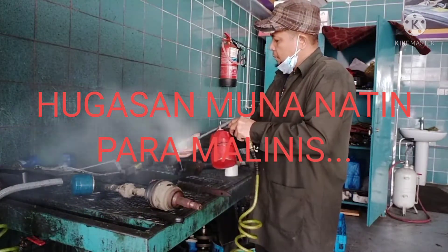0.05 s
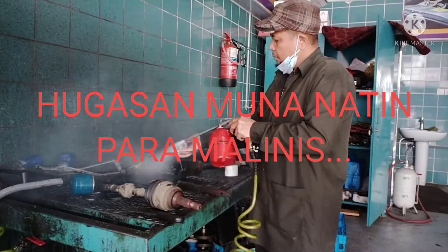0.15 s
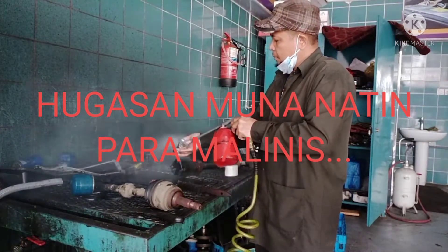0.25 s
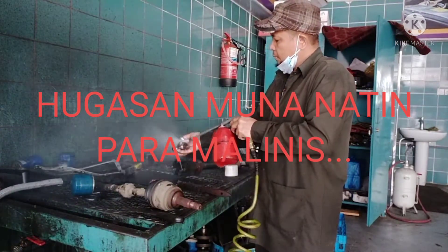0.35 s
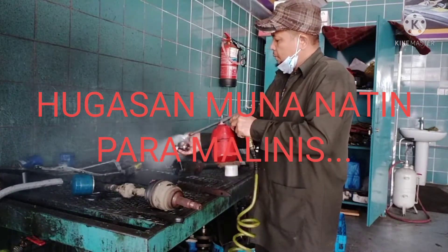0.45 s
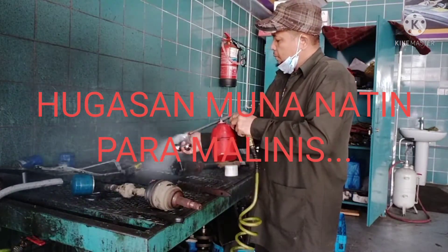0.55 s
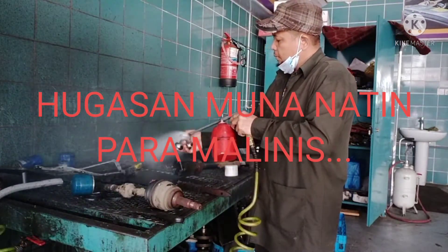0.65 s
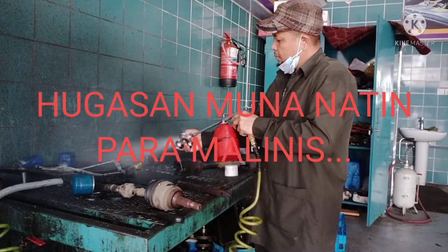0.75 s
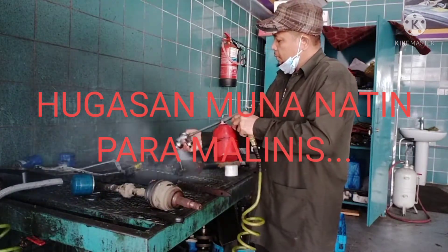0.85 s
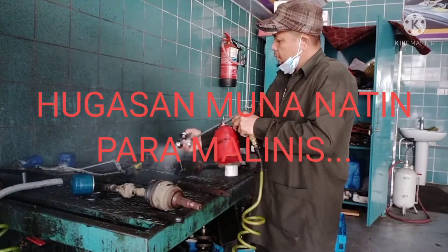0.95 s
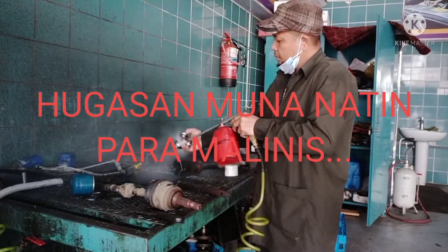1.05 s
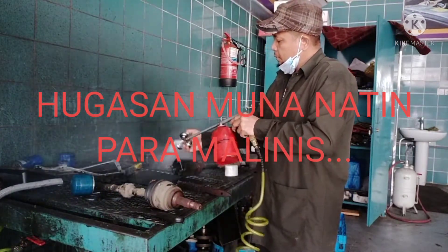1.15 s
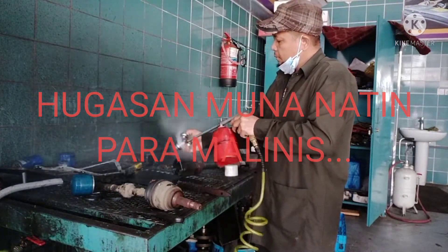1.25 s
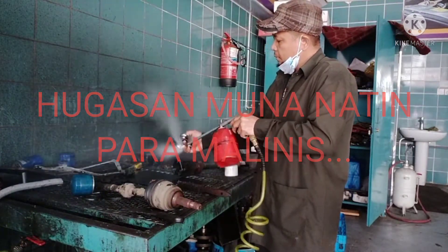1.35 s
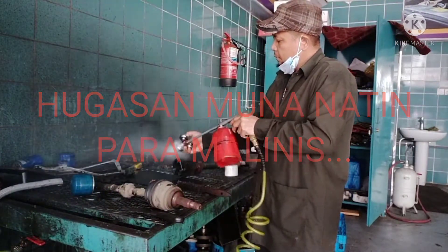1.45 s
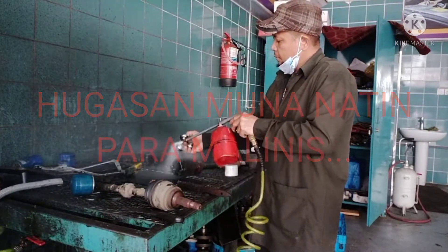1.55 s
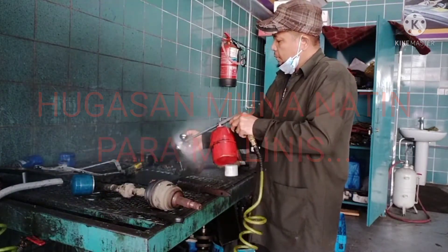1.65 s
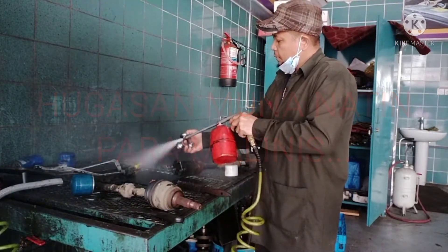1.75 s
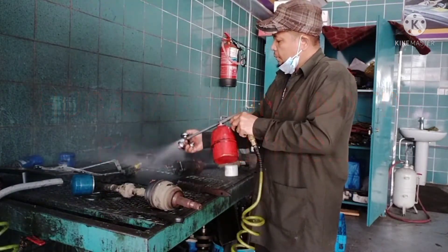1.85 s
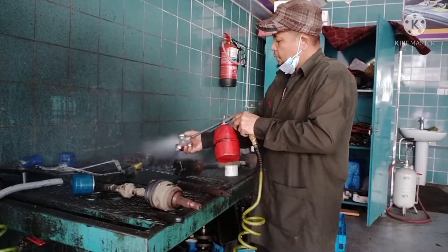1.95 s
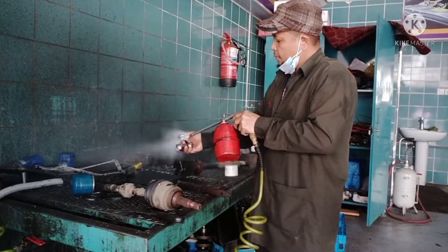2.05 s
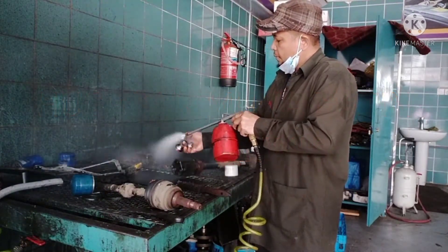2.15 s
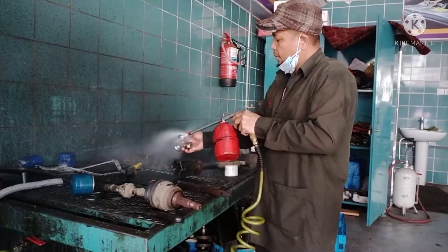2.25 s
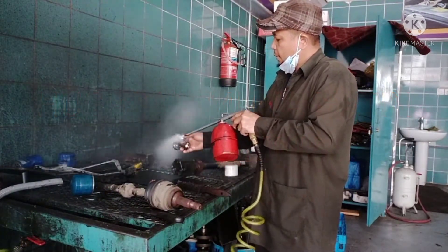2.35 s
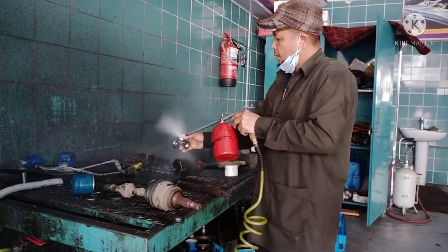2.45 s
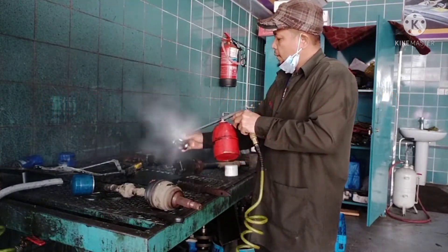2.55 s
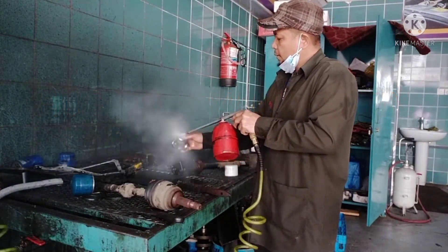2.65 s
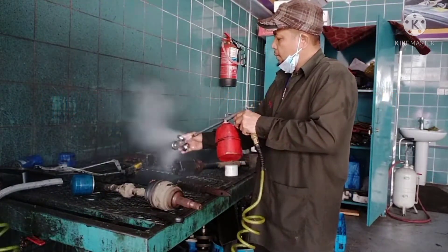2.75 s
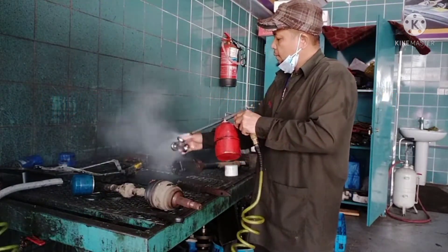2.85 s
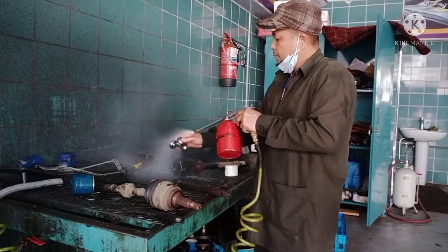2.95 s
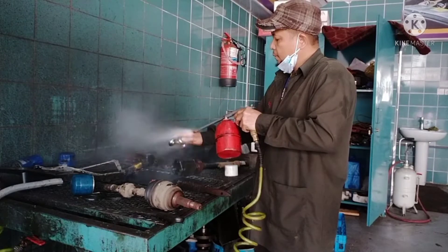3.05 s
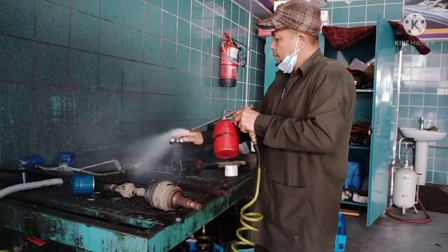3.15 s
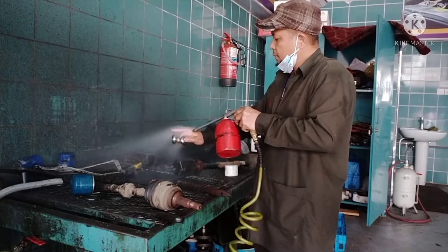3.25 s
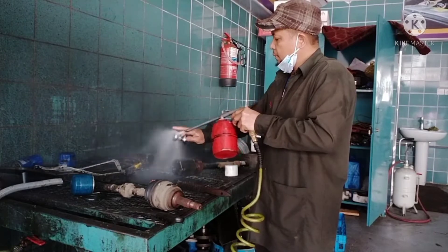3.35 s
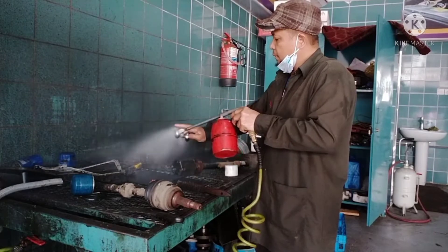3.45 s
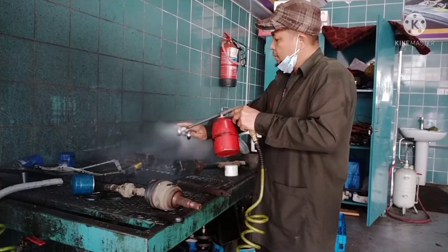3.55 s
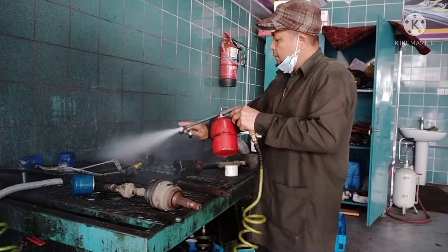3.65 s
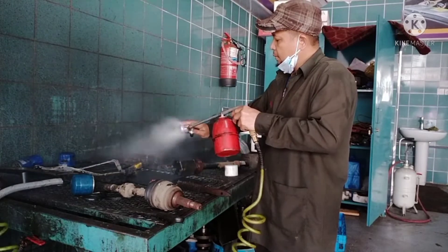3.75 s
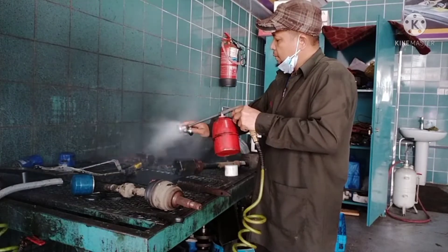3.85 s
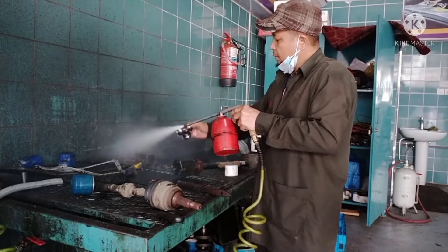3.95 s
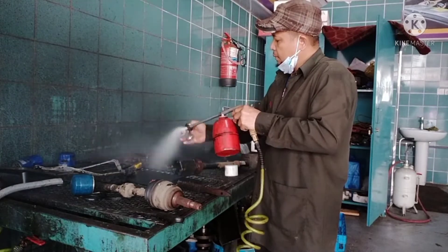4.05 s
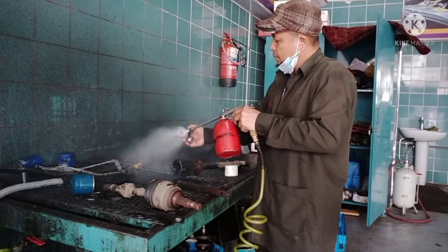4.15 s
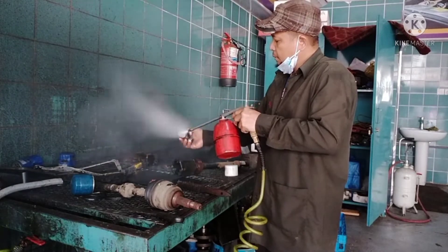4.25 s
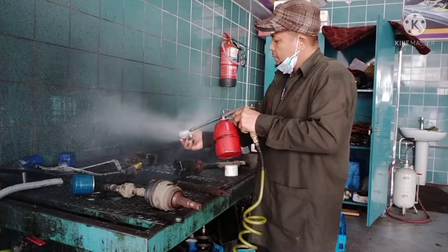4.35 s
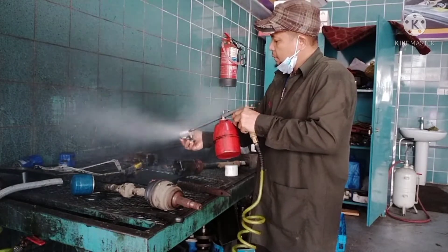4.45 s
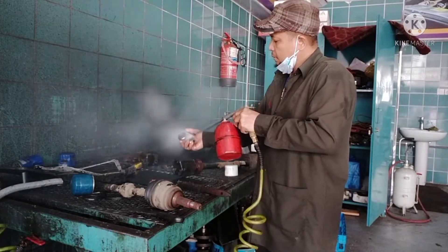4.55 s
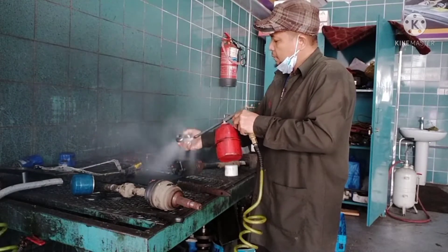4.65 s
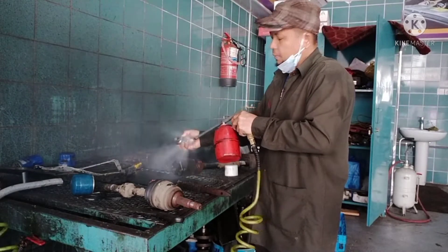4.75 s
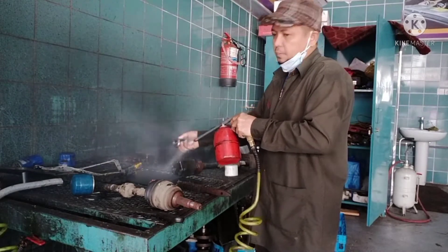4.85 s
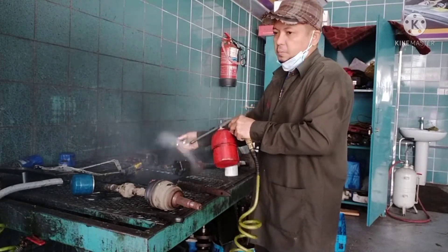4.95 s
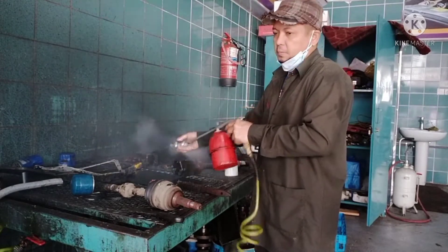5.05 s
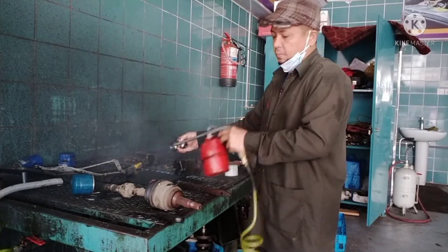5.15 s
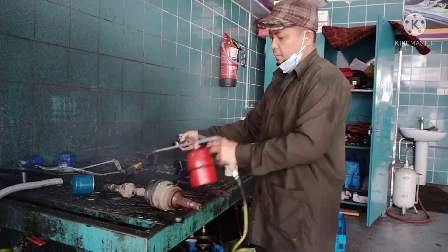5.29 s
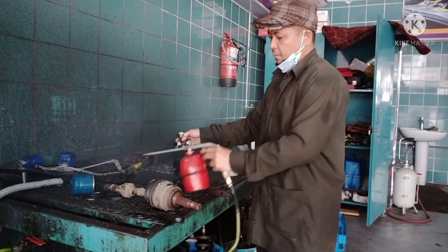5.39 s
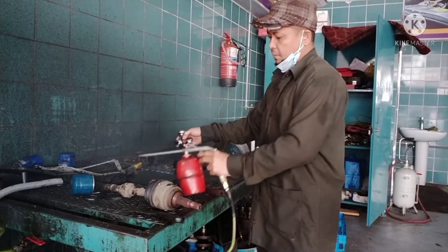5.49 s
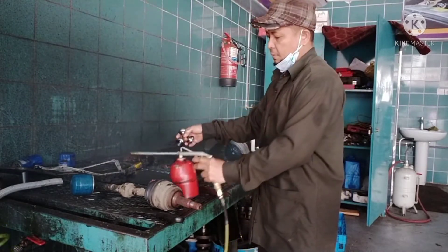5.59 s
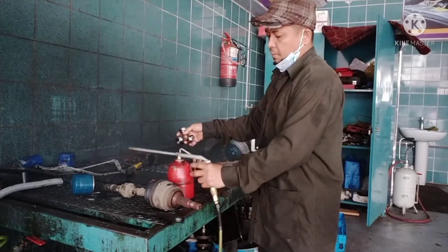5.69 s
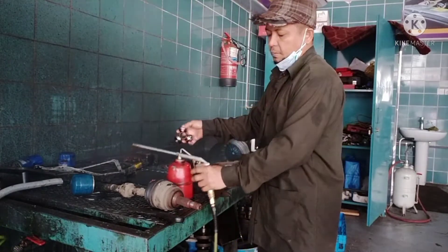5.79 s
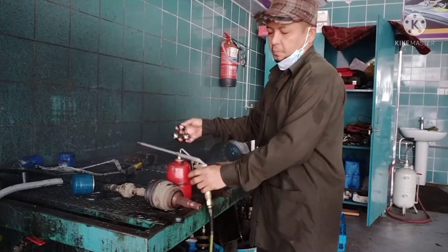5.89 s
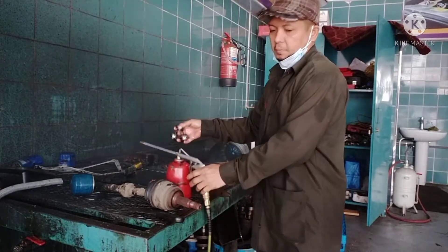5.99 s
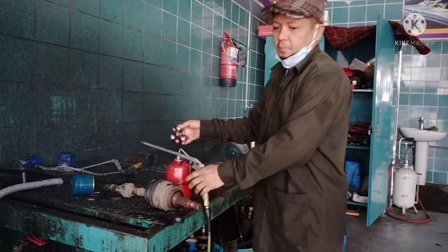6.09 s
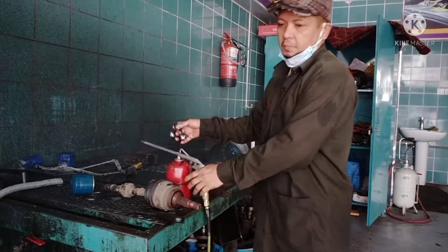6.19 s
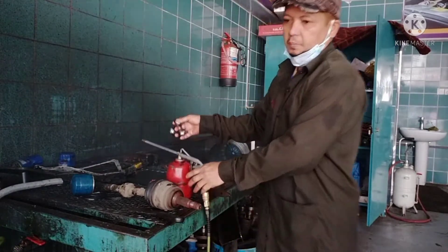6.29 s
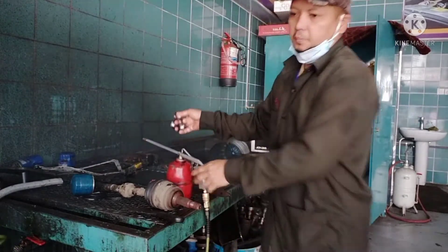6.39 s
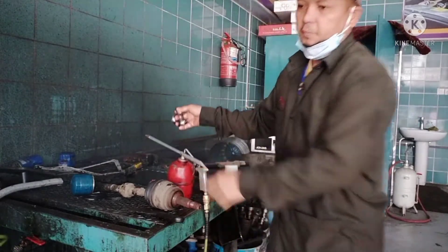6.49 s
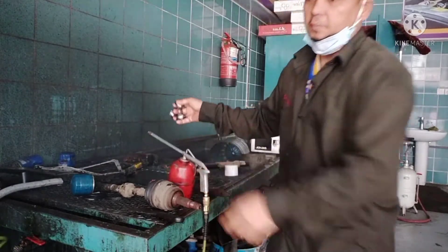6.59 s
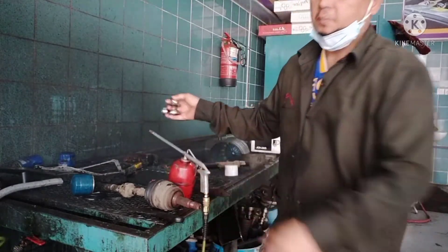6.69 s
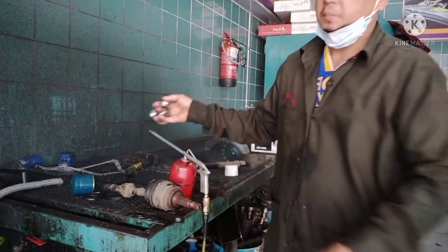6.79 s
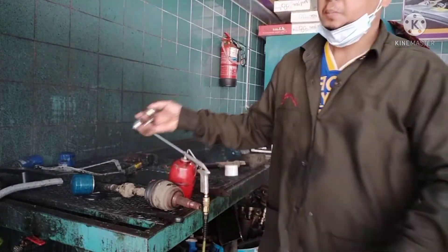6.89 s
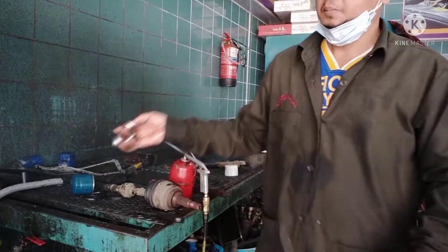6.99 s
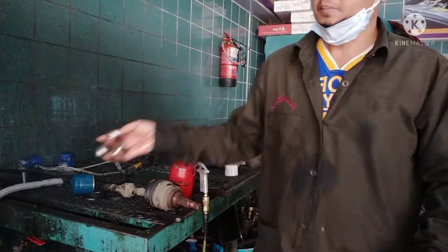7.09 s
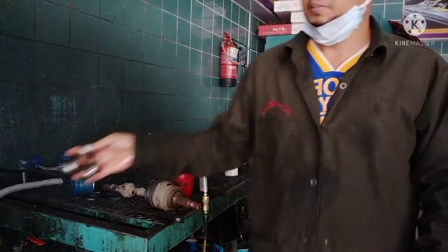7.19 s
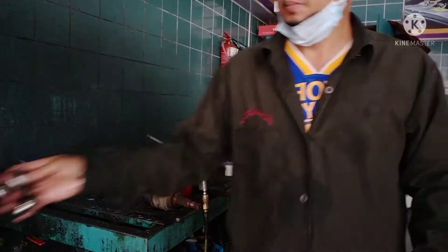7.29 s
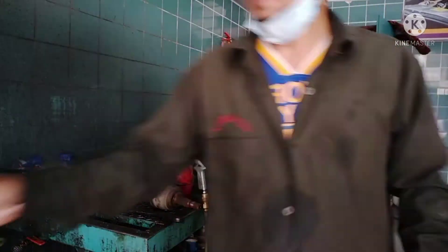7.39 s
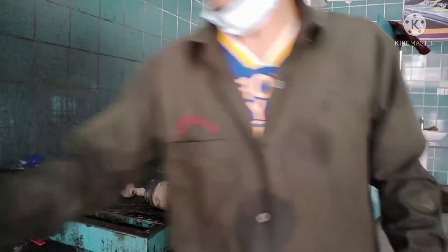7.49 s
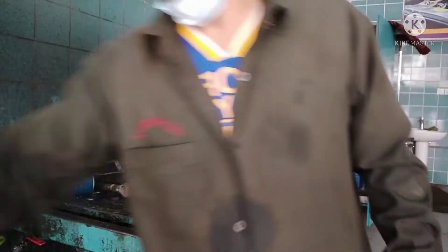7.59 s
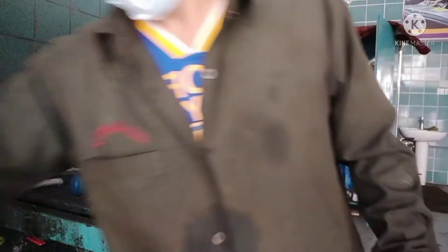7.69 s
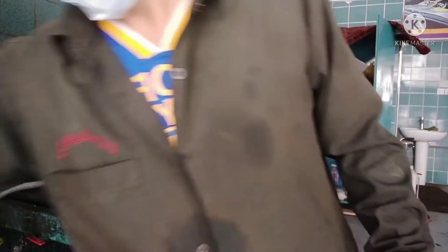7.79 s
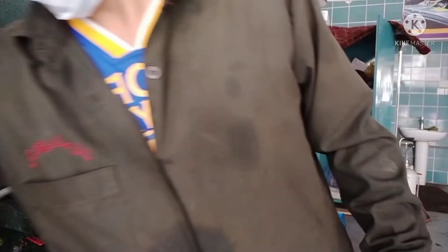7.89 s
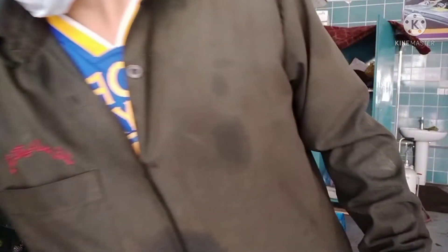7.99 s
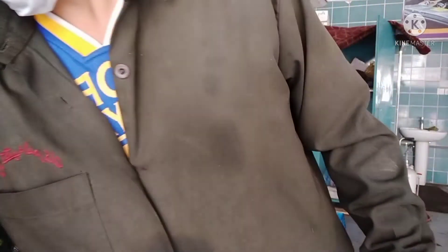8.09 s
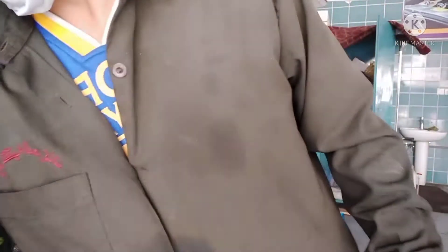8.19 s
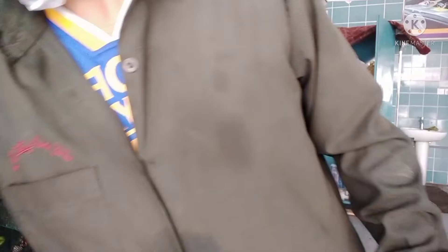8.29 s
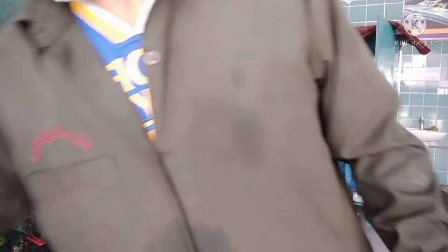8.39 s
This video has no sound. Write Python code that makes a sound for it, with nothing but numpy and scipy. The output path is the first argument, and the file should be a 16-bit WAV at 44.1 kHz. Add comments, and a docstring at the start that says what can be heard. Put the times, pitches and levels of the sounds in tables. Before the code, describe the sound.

From 0 s a compressed-air spray gun is in full flow in a hard, tiled workshop, heard by one fairly near microphone. A very bright airy hiss with a ringing high edge sits over a rough, wet midrange roar and fine sizzling mist. The liquid falters in quick gaps and surges, most broken around 2.6 to 3.2 s, with tiny spits and brief breathy whistles near 0.8, 3.2, 4.1 and 4.6 s. Around 4.9 s the trigger is released; a hollow low draught buffets the microphone near 5 s and the wet roar dies away. A last spurt sizzles at 5.5 s, then a quieter, wavering air leak persists with a dull rush and a faint fading whistle. Deep rumble becomes clearer. From about 7 s the hiss is coloured slightly by a close body, and a low motor hum swells near 7.6 s, easing after 8 s as the leak continues to the end.

```python
"""A bright jet hisses at once, and the liquid it draws roars, spits and gaps: a compressed-air spray gun
washes metal parts on a bench in a tiled workshop. Filtered noise makes the air, noise and random drops the liquid.
Near 5 s a draught puffs on the microphone and the spraying stops; air goes on leaking from the gun.
The worker steps up close and his chest reflects the hiss; delayed copies of the gun make all its echoes.
The workshop rumbles underneath, and a low motor hum, a wavering sine with a noisy drone, swells near the end."""
import sys
import numpy as np
from scipy import signal
from scipy.fft import rfft, irfft, next_fast_len
from scipy.io import wavfile

SR = 44100
rng = np.random.default_rng(int(sys.argv[2]) if len(sys.argv) > 2 else 0)


def generate_wav(sig):
    """Save sig (samples, or channels by samples) to the path in sys.argv[1] as 16-bit PCM at SR."""
    pcm = np.round(np.clip(np.atleast_2d(sig).T, -1, 1) * 32767).astype(np.int16)
    wavfile.write(sys.argv[1], SR, pcm)


N = 371763
TIME = np.arange(N) / SR   # s
FFT_LENGTH = 2 * next_fast_len(N // 2 + 1)
FREQS = np.maximum(np.fft.rfftfreq(FFT_LENGTH, 1 / SR), 1)   # Hz

TRIGGER_OFF_S, TRIGGER_CLOSE_S = 4.89, 0.065   # the trigger is let go, and how long the air takes to shut
NEAR_S, APPROACH_S = 7.37, 0.37   # the worker's chest is close to the microphone, and how long he takes to come


def from_db(db):
    """Decibels to gain."""
    return 10 ** (np.asarray(db) / 20)


def rms_one(x):
    """Scale to rms 1."""
    return x / np.sqrt(np.mean(x ** 2) + 1e-20)


def curve(rows):
    """A control curve as a value per sample, held beyond its ends."""
    return np.interp(TIME, *np.transpose(rows))


def ramp(end_s, length_s):
    """Rise from 0 to 1, arriving at end_s."""
    return np.clip(1 + (TIME - end_s) / length_s, 0, 1)


def swell(peak_s, attack_s, db, fall_db_per_s, hold_s=0):
    """Envelope: a straight attack, a hold, then a steady fall in dB."""
    falling_s = np.maximum(TIME - peak_s - hold_s, 0)
    return ramp(peak_s, attack_s) * from_db(db - fall_db_per_s * falling_s)


def bumps(rows):
    """Sum of bell shapes given as (middle, length, height)."""
    out = np.zeros(N)
    for middle_s, length_s, height in rows:
        near = slice(*np.searchsorted(TIME, [middle_s - 2 * length_s, middle_s + 2 * length_s]))
        out[near] += height * np.exp(-(2 * (TIME[near] - middle_s) / length_s) ** 2)
    return out


def shaped(x, response):
    """Filter by a gain per frequency."""
    return irfft(rfft(x, FFT_LENGTH) * response)[:N]


def colour(points):
    """A short spectrum as a gain per frequency, falling 20 dB per octave beyond its ends."""
    hz, db = np.transpose(points)
    octaves_outside = np.abs(np.log2(FREQS / np.clip(FREQS, hz[0], hz[-1])))
    return from_db(np.interp(np.log(FREQS), np.log(hz), db) - 20 * octaves_outside)


def resonance(hz, width_hz):
    """Gain per frequency of one resonance."""
    return 1 / np.sqrt(1 + ((FREQS ** 2 - hz ** 2) / (FREQS * width_hz)) ** 2)


def drift(rate):
    """Smooth chance of spread 1 that changes about rate times a second."""
    pole = np.exp(-40 * np.pi * rate / SR)   # runs at one value per 20 samples
    white = rng.standard_normal(N // 20 + 4002)
    slow = signal.lfilter([1], [1, -2 * pole, pole * pole], white)[4000:]
    return np.interp(np.arange(N) / 20, np.arange(len(slow)), rms_one(slow))


def noise(response):
    """Smooth coloured noise of rms 1."""
    return rms_one(shaped(rng.standard_normal(N), response))


def turbulent(source, response, eddy_db, count=8):
    """Colour a source; eddies make neighbouring bands swell and sink on their own."""
    # overlapping bands that each carry a like share of the power
    place = np.cumsum(response ** 2) / np.sum(response ** 2) * (count - 1)
    spectrum = rfft(source, FFT_LENGTH) * response
    total = np.zeros(N)
    for k in range(count):
        band = irfft(spectrum * np.maximum(0, 1 - np.abs(place - k)))[:N]
        total += band * from_db(eddy_db * drift(28))
    return rms_one(total)


def droplets(per_s, spread_db):
    """Random impacts, mostly small and now and then large."""
    sizes = from_db(spread_db * np.minimum(rng.exponential(1, N), 4))
    signs = rng.choice([-1, 1], N)
    return rms_one(sizes * signs * (rng.random(N) < per_s / SR))


# Air flow at the gun while the trigger is held. Each row: time in seconds, level in dB about its usual value.
AIR_FLOW = [(0, 0.5), (1.35, 0), (2.0, -0.8), (2.3, -0.5), (2.8, 0.1), (2.92, -3.5), (3.0, -1.3),
            (3.14, -3), (3.25, 0), (4.05, 0.06), (4.2, 1.3), (4.9, 0.3)]


def air_flow():
    """The strength of the air in dB, which moves both the jet and the liquid it draws."""
    return curve(AIR_FLOW)


# The liquid feed falters. Each row: middle in seconds, length in seconds, dip of the roar in dB,
# dip of the mist in dB.
FEED_GAPS = [(.16, 0.063, 2.5, -3), (.47, 0.24, 3.5, 4), (0.868, 0.059, 10.5, 3.5), (.97, 0.037, 4, 2),
             (1.145, 0.24, 1, 1), (1.668, .09, 3.5, 0), (2.09, 0.12, 5.5, 4), (2.38, .07, 6, 0.5),
             (2.593, 0.047, 7, 2), (2.74, .11, 6, -1.5), (2.853, 0.091, 9, 6), (2.945, 0.079, 8, 10),
             (3.102, 0.12, 9.5, 5), (3.528, 0.15, 4.5, 2), (3.826, .12, 7, 2.5), (4.02, 0.085, 3, 4),
             (4.558, 0.13, 3, 2), (4.926, 0.084, 5, 2.5)]
# A thick slug of liquid comes through. Each row: middle in seconds, length in seconds, rise in dB.
FEED_SURGES = [(.27, .06, 2), (.71, 0.19, 2), (1.39, 0.13, 2.2), (1.85, 0.08, 3.5), (3.4, .1, 2.5),
               (3.715, 0.043, 2.5), (4.16, 0.045, 1.5), (5.05, 0.11, 1.5)]


def liquid_feed():
    """The liquid feed in dB: slugs lift it and gaps starve it."""
    return bumps(FEED_SURGES) - bumps([(s, length, dip) for s, length, dip, _ in FEED_GAPS])


# Body of the liquid's roar. Each row: frequency in Hz, relative density in dB per Hz.
ROAR_SPECTRUM = [(88, -26), (150, -4.5), (564, -2), (2210, 0), (2800, -2.5), (4200, -12.5), (5460, -20.5),
                 (9240, -120)]
# Fine mist on top of it. Each row: frequency in Hz, relative density in dB per Hz.
MIST_SPECTRUM = [(2500, 2), (3600, 0), (4400, -.5), (5500, -4), (6800, -2), (7600, 0), (9000, -25)]
RUNS_EMPTY_S = 5.04   # no liquid is left
# roar and mist: level in dB, share of the air flow's swing, fall once empty in dB per s
ROAR_DB, ROAR_FOLLOWS_FLOW, ROAR_FALL_DB_PER_S = -32.5, 0.83, 29.5
MIST_DB, MIST_FOLLOWS_FLOW, MIST_FALL_DB_PER_S = -37, 1.6, 100
MIST_FOLLOWS_SURGE = 0.4   # share of a slug's rise that the mist takes
# liquid returns as fine mist: share of the gap's depth, lag in gap lengths, length in s
FLARE_SHARE, FLARE_LAG, FLARE_S = 0.35, 0.6, 0.071
COARSE_HZ, COARSE_EXTRA_SWING = 900, 0.31   # big drops, below this pitch, follow the feed more strongly


def spray(flow_db, feed_db):
    """Liquid torn into drops in uneven slugs: a roar with a sizzle of mist; both die as the gun runs empty."""
    empty_s = np.maximum(TIME - RUNS_EMPTY_S, 0)
    thinning_db = bumps([(s, length, mist_dip) for s, length, _, mist_dip in FEED_GAPS])
    flare_db = bumps([(s + FLARE_LAG * length, FLARE_S, FLARE_SHARE * dip) for s, length, dip, _ in FEED_GAPS])
    slugs = drift(68)

    roar_db = ROAR_DB + ROAR_FOLLOWS_FLOW * flow_db + feed_db - ROAR_FALL_DB_PER_S * empty_s
    drops = rng.standard_normal(N) + from_db(-3) * droplets(per_s=2200, spread_db=4.5)
    roar = from_db(roar_db + slugs) * turbulent(drops, colour(ROAR_SPECTRUM), eddy_db=1.2)
    coarse = shaped(roar, 1 / (1 + (FREQS / COARSE_HZ) ** 2))
    fine = roar - coarse

    mist_db = MIST_DB + MIST_FOLLOWS_FLOW * flow_db + MIST_FOLLOWS_SURGE * bumps(FEED_SURGES)
    mist_db = mist_db + flare_db - thinning_db - MIST_FALL_DB_PER_S * empty_s
    sizzle = turbulent(rng.standard_normal(N), colour(MIST_SPECTRUM), eddy_db=1.54, count=4)
    mist = from_db(mist_db + 0.47 * slugs) * sizzle
    return coarse * from_db(COARSE_EXTRA_SWING * feed_db) + fine + mist


# Hiss of the air. Each row: frequency in Hz, relative density in dB per Hz.
HISS_SPECTRUM = [(3000, -21), (6000, -17), (7300, -11.5), (9200, -8.5), (11000, -5.5), (12600, -4.5),
                 (14000, -0.5), (15400, 3), (16500, -3)]
# The hiss swells or ducks as the nozzle swings. Each row: middle in seconds, length in seconds, change in dB.
NOZZLE_SWINGS = [(.035, 0.037, -1), (.095, .05, 3), (.165, .06, -3), (.235, .05, 2.5), (.37, .05, 1.5),
                 (.45, .07, -1), (1.22, 0.028, 3.5), (1.34, .1, 2.5), (1.93, 0.11, -2), (2.3, 0.16, 2.5),
                 (2.7, .06, -2.5), (3.53, .04, 1), (4.53, .12, -3)]
# Level of the broad ring near 8.2 kHz that colours the hiss.
# Each row: time in seconds, level in dB before air flow and waver.
HISS_RING = [(0, -39), (.45, -38), (.78, -35), (1.15, -46), (1.4, -38.5), (1.84, -33.5), (1.94, -38.5),
             (2.3, -36.5), (2.7, -39), (3.15, -38.5), (3.36, -36), (3.5, -38), (4.05, -40), (4.15, -35),
             (4.52, -38.5), (4.68, -36), (4.82, -41), (4.95, -37)]
HISS_DB, LEAK_HISS_DB, LEAK_RING_DB = -28.5, -33, -45.5   # spraying hiss; hiss and ring of the usual leak
RING_CLOSE_S = 0.2   # the ring sinks more slowly than the hiss once the trigger is let go
LEAK_BODY_FOLLOWS = 1.5   # share of the leak's swing in its ring, sizzle and rush


def jet(flow_db, leak_db):
    """Turbulent air hisses, coloured by a broad ring with a narrow core; it drops to a leak on release."""
    shut = ramp(TRIGGER_OFF_S + TRIGGER_CLOSE_S, TRIGGER_CLOSE_S)
    hiss_db = (1 - shut) * (HISS_DB + flow_db + bumps(NOZZLE_SWINGS)) + shut * (LEAK_HISS_DB + leak_db)
    hiss = from_db(hiss_db) * turbulent(rng.standard_normal(N), colour(HISS_SPECTRUM), eddy_db=0.75)

    sunk = ramp(TRIGGER_OFF_S + RING_CLOSE_S, RING_CLOSE_S)
    spraying_ring_db = curve(HISS_RING) + flow_db + 2.0 * drift(10)
    leaking_ring_db = LEAK_RING_DB + LEAK_BODY_FOLLOWS * leak_db
    broad = noise(resonance(8220, 1540) ** 1.2)
    core = from_db(-10) * noise(resonance(8210, 300) ** 2)
    ring = from_db((1 - sunk) * spraying_ring_db + sunk * leaking_ring_db) * (broad + core)

    flutter_db, sway_db = 0.5 * drift(28), 0.5 * drift(6)
    return (hiss + ring) * from_db(flutter_db + sway_db)


def buffets(feed_db):
    """Air stirred by the spray reaches the microphone in low lumps while the trigger is held."""
    held = 1 - ramp(TRIGGER_OFF_S + TRIGGER_CLOSE_S, TRIGGER_CLOSE_S)
    lumps = noise(colour([(8, 9.5), (25, -8), (60, -7.5), (130, -9)]))   # (Hz, relative dB)
    return held * from_db(-43.5 + 1.14 * feed_db) * lumps


# The rumble of the workshop comes forward once the spraying stops. Each row: time in seconds, level in dB.
RUMBLE_LEVEL = [(0, -57), (3, -63), (4.8, -57), (5.6, -47), (6.7, -50.5), (7.5, -46.5), (8.43, -48.5)]
# Its tone at the microphone. Each row: frequency in Hz, relative density in dB per Hz.
RUMBLE_SPECTRUM = [(8.8, -29), (15, 1), (32, -4), (70, -10.5), (107, -5.5), (140, -11), (198, -12),
                   (231, -12), (300, -14), (390, -58), (660, -120)]


def workshop():
    """Rumble with a deep machine throb, and a motor that swells with a hum and a rough drone."""
    throb = from_db(-7) * noise(resonance(22.4, 6.5) ** 2)
    rumble = from_db(curve(RUMBLE_LEVEL)) * (noise(colour(RUMBLE_SPECTRUM)) + throb)
    hum_hz = 124.5 + drift(4.7)
    hum = from_db(1.5) * np.sin(2 * np.pi * np.cumsum(hum_hz) / SR)
    drone = from_db(-13) * noise(resonance(184, 70) ** 2)
    motor = swell(peak_s=7.66, attack_s=0.3, db=-45.5, fall_db_per_s=15, hold_s=0.34)
    return rumble + motor * (hum + drone)


def echo(x, delay_s):
    """Read a signal late by a delay that may move."""
    return np.interp(TIME - delay_s, TIME, x, left=0)


# Echoes off the tiles and the bench, 1 to 10 m of extra path to the microphone.
# Each row: delay in seconds about which it drifts, level in dB.
ROOM_ECHOES = [(.0031, -34.5), (.0056, -39), (.0089, -23), (.0137, -23), (0.02, -21.5), (.0304, -17.5)]


def reflections(x):
    """Hard surfaces shift their echoes as things move; small near ones return only the treble."""
    room = sum(from_db(db) * echo(x, delay * (1 + 0.03006 * drift(0.298))) for delay, db in ROOM_ECHOES)
    treble = signal.sosfilt(signal.butter(1, 2500, "high", fs=SR, output="sos"), x)
    # the nozzle is waved over the parts, so their echo, with about 0.2 m of extra path, swishes
    waving = np.clip((5.4 - TIME) / 0.28, 0, 1)
    parts = waving * from_db(-14) * echo(treble, 0.000606 * np.exp(0.353 * drift(0.87)))
    # the worker's chest: about 0.34 m of extra path
    chest = ramp(NEAR_S, APPROACH_S) * from_db(-12) * echo(treble, 0.000993)
    return x + room + parts + chest


# Large drops spat from the nozzle. Each row: start in seconds, level in dB before a common cut of 9 dB.
LARGE_DROPS = [(0.274, -14), (0.9, -19), (1.704, -9), (2.098, -13), (2.172, -16), (2.213, -20),
               (2.314, -10), (2.408, -10), (3.152, -22.5), (4.589, -12)]


def spits(decay_s=0.0012):
    """A large drop bursts in a few milliseconds: noise about 1400 Hz that starts at once and dies away."""
    burst = np.zeros(N)
    for start_s, db in LARGE_DROPS:
        at = round(start_s * SR)
        burst[at:] += from_db(db - 9) * np.exp(-np.minimum(TIME[:N - at] / decay_s, 20))
    return burst * noise(resonance(1400, 2000) ** 2)


# The jet whistles over edges of the parts. Each row: start in seconds, length in seconds, first pitch in Hz,
# last pitch in Hz, level in dB at the middle.
EDGE_WHISTLES = [(0.722, 0.16, 4670, 4550, -42), (0.868, 0.094, 4400, 5440, -41),
                 (3.19, 0.041, 4000, 4900, -35.5), (4.13, .26, 7270, 6980, -40),
                 (4.587, 0.087, 6400, 6500, -38)]


def edge_tones(width_hz=340):
    """Breathy whistles that glide as the jet crosses an edge: tones blurred by random amplitude and phase."""
    out = np.zeros(N)
    in_phase, quadrature = drift(width_hz), drift(width_hz)
    for start_s, length_s, first_hz, last_hz, db in EDGE_WHISTLES:
        progress = np.clip((TIME - start_s) / length_s, 0, 1)
        phase = 2 * np.pi * np.cumsum(first_hz + (last_hz - first_hz) * progress) / SR
        breath = in_phase * np.cos(phase) + quadrature * np.sin(phase)
        out += from_db(db) * np.sin(np.pi * progress) * breath
    return out


# Draughts hit the microphone. Each row: peak in seconds, attack in seconds, level in dB before flutter,
# fall in dB per second, hold in seconds.
DRAUGHTS = [(4.775, 0.027, -34, 170, .008), (4.998, 0.098, -28, 39, 0.075)]
# Low roar of a draught on the microphone. Each row: frequency in Hz, relative density in dB per Hz.
PUFF_SPECTRUM = [(18, -32), (30, 0), (32, -14), (54, -9), (86, -11), (136, 4), (172, -5.5), (221, -0.5),
                 (421, -5.5), (487, -4), (548, -15), (916, -10.5), (1000, -8.5), (1300, -16), (2200, -120)]


def puff(gust_s=5.03):
    """Draughts buffet the microphone: a hollow low roar that dulls as it dies, and one slow push of pressure."""
    hollow = noise(colour(PUFF_SPECTRUM))
    hollow = hollow + from_db(-11) * noise(resonance(488, 45) ** 2)
    hollow = hollow + from_db(-9.5) * noise(resonance(260, 111) ** 2)
    # the part above 300 Hz is lost first
    deep = shaped(hollow, 1 / (1 + (FREQS / 300) ** 4))
    dulled = deep + (hollow - deep) * np.exp(-1.2 * np.maximum(TIME - gust_s, 0))
    draught = sum(swell(*row) for row in DRAUGHTS)
    roar = draught * dulled * from_db(0.84 * drift(40) - 0.8)

    gust = from_db(-17) * np.exp(-((TIME - gust_s) / 0.08) ** 2)
    # the capsule's vent lets steady pressure out
    push = signal.sosfilt(signal.butter(2, 0.6, "high", fs=SR, output="sos"), gust)
    return roar + push


# Air leaking from the resting gun. Each row: time in seconds, level in dB about its usual value.
LEAK_FLOW = [(4.97, -3), (5.03, 0.7), (5.3, -1.5), (5.47, 2.5), (5.8, 0), (6.08, -0.3), (6.17, 1),
             (6.3, -1), (6.435, 2.5), (6.455, -2.5), (6.52, -1.3), (6.6, 1), (6.78, -0.8), (6.95, 0.5),
             (7.07, -2), (7.42, 0.6), (7.8, -1.5), (8.2, -1.6), (8.43, 0)]


def leak_flow():
    """The strength of the leak in dB, which moves all its layers but the whistle and the last spurt."""
    return curve(LEAK_FLOW)


# Sizzle of the leak. Each row: frequency in Hz, relative density in dB per Hz.
LEAK_SIZZLE_SPECTRUM = [(2000, -5), (3000, 3.5), (3500, 1.5), (4100, -1), (5500, -4), (6500, -12),
                        (8000, -12.5)]
# Duller rush of the leak. Each row: frequency in Hz, relative density in dB per Hz.
LEAK_RUSH_SPECTRUM = [(200, -5.5), (400, -2.5), (650, -0.5), (1000, 1), (1400, -1.5), (1900, -5.5),
                      (2600, -11), (3200, -12)]
SPURT_S, SPURT_ATTACK_S = 5.51, 0.14   # the last liquid is blown out


def leak(leak_db):
    """Under the resting gun's hiss: a sizzle that opens with a last spurt, a duller rush, a fading whistle."""
    strength = ramp(SPURT_S, SPURT_ATTACK_S) * from_db(LEAK_BODY_FOLLOWS * leak_db)
    spurt = swell(SPURT_S, SPURT_ATTACK_S, db=-44.5, fall_db_per_s=27)
    sizzle = np.hypot(spurt, strength * from_db(-52.9)) * noise(colour(LEAK_SIZZLE_SPECTRUM))
    # the rush gains 3 dB when the worker is near
    rush_db = -45.5 + 3 * ramp(NEAR_S, APPROACH_S)
    rush = strength * from_db(rush_db) * noise(colour(LEAK_RUSH_SPECTRUM))
    whistle = swell(peak_s=5.2, attack_s=0.14, db=-46.5, fall_db_per_s=7) * noise(resonance(1289, 50) ** 2)
    return sizzle + rush + whistle


def scene():
    """Air flow, liquid feed and leak drive the gun; one microphone hears it all, so both channels are alike."""
    flow_db, feed_db, leak_db = air_flow(), liquid_feed(), leak_flow()
    gun = spray(flow_db, feed_db) + jet(flow_db, leak_db) + spits() + edge_tones() + leak(leak_db)
    mono = reflections(gun) + buffets(feed_db) + workshop() + puff()
    return np.array([mono, mono])


def record(dry):
    """The top is cut steeply, over 100 Hz about 15550 Hz."""
    passband = np.clip((15550 - FREQS) / 100 + 0.5, 0, 1)
    return np.array([shaped(channel, passband) for channel in dry])


dry = scene()
out = record(dry)
generate_wav(out)
```